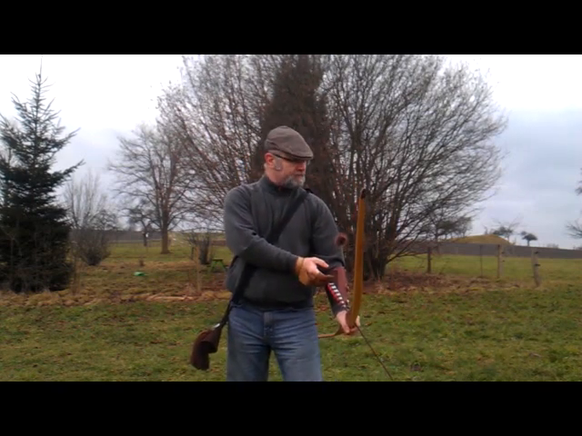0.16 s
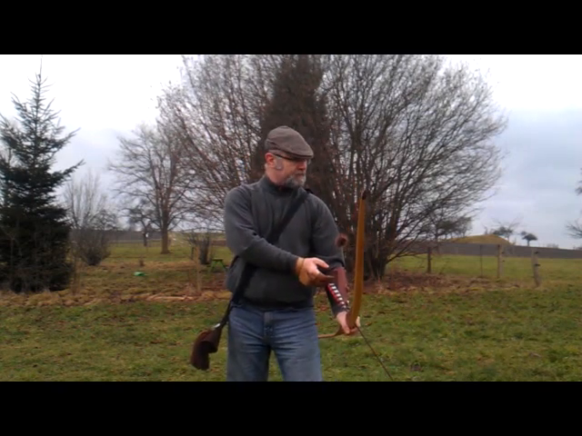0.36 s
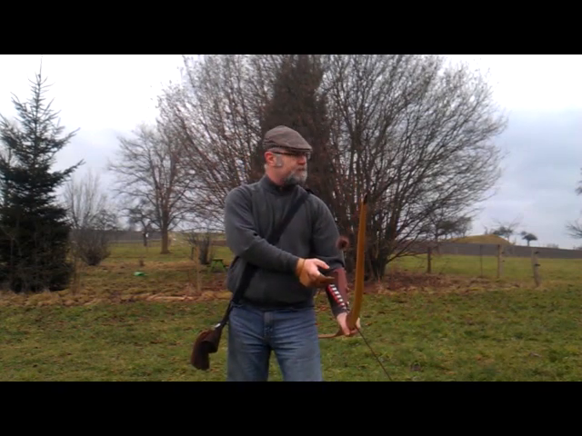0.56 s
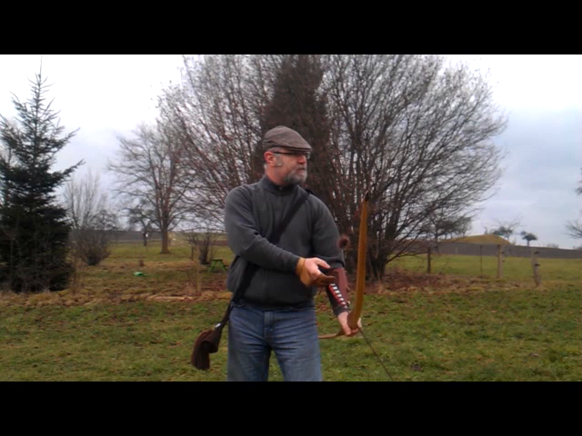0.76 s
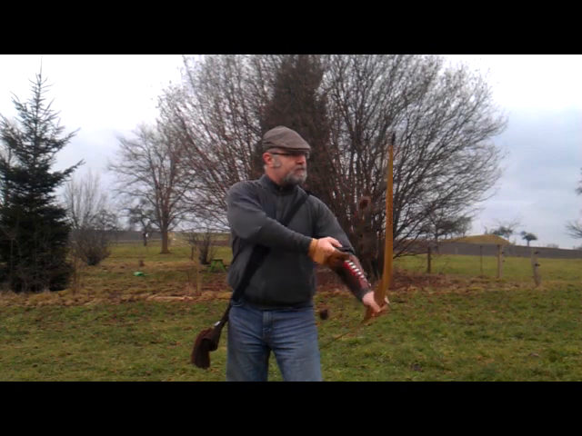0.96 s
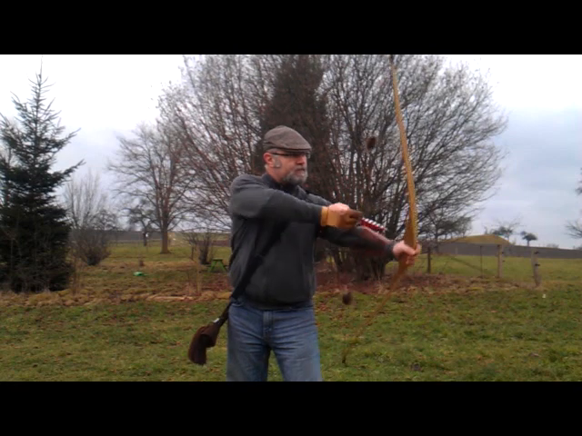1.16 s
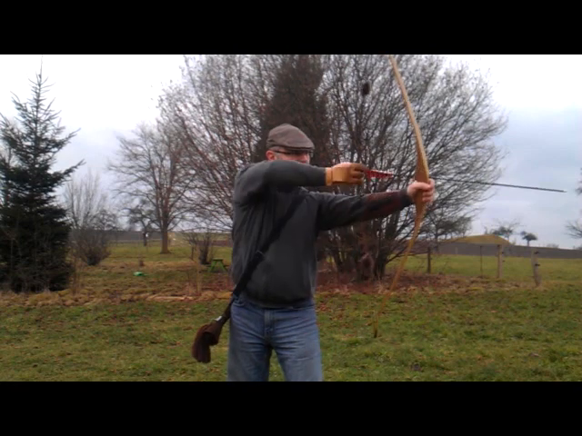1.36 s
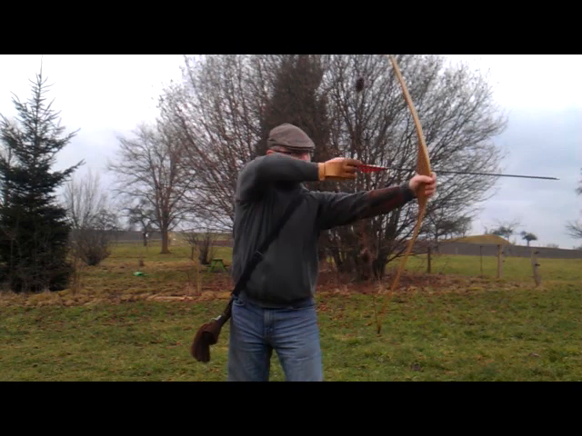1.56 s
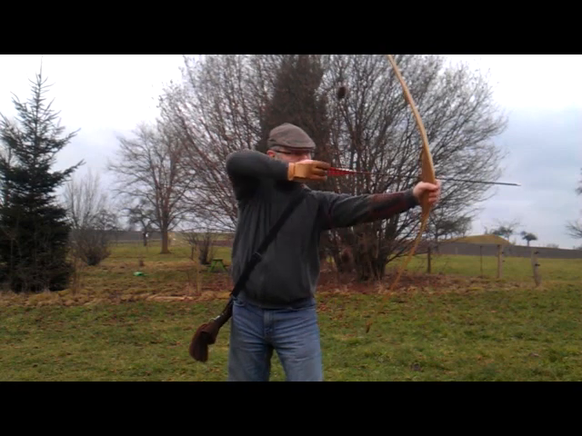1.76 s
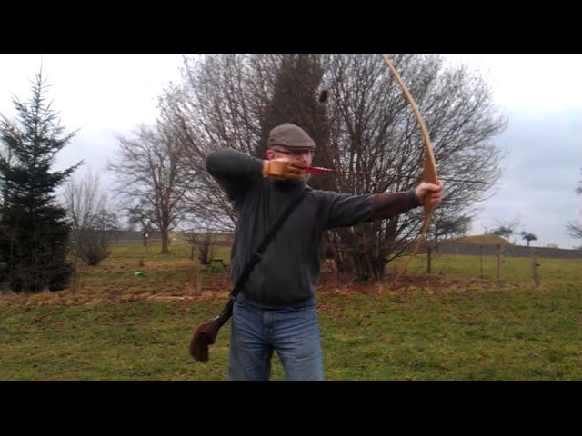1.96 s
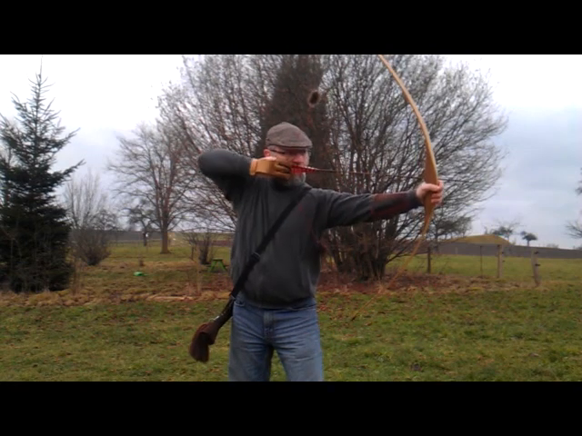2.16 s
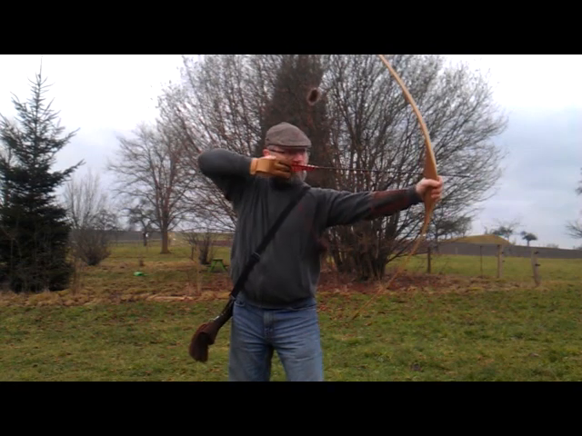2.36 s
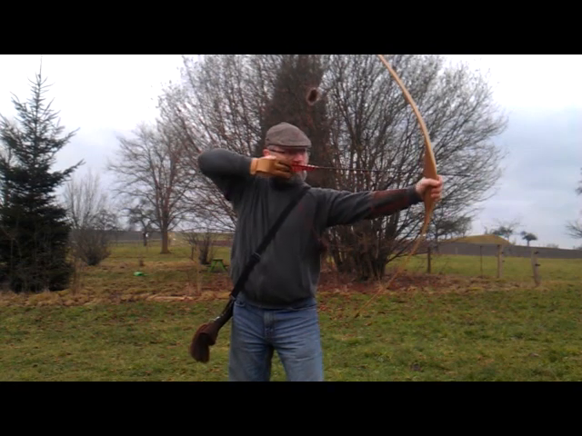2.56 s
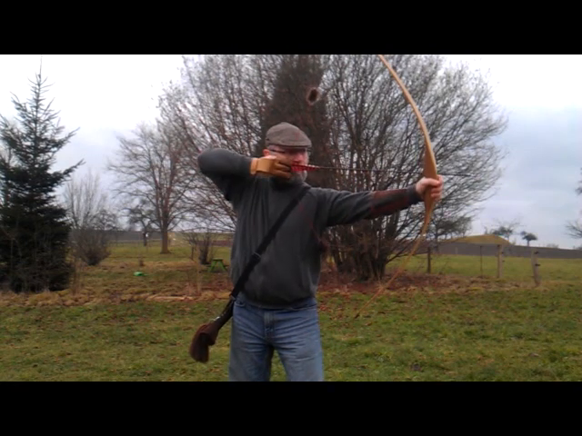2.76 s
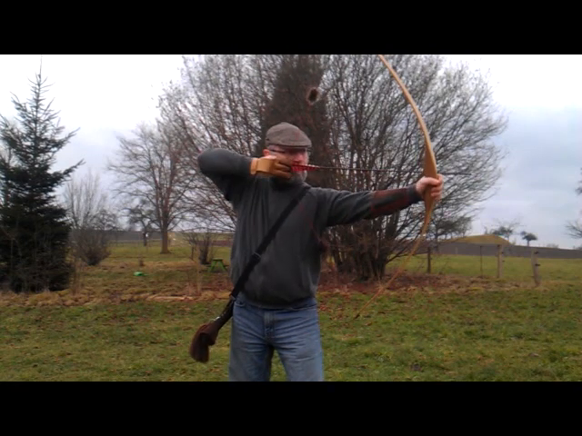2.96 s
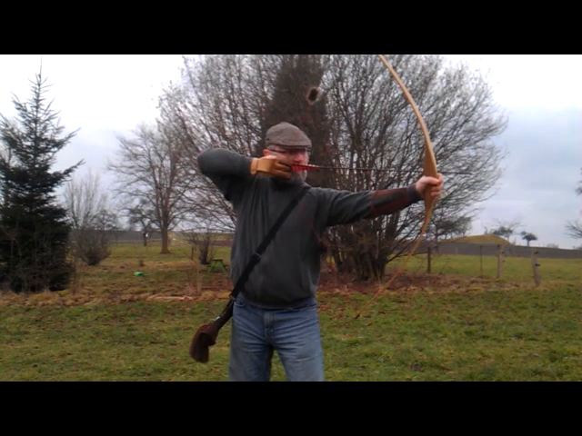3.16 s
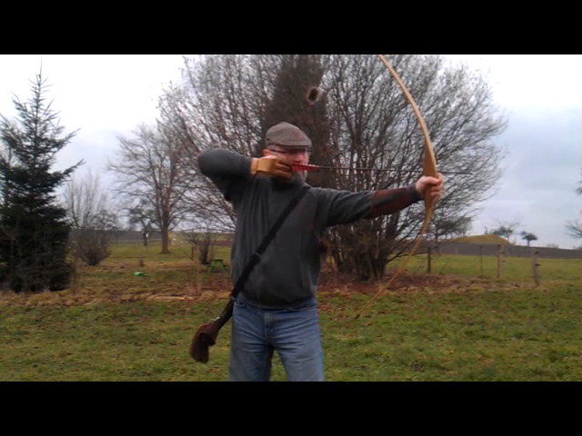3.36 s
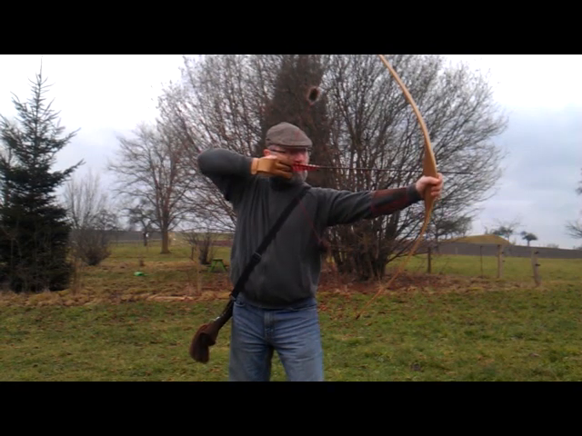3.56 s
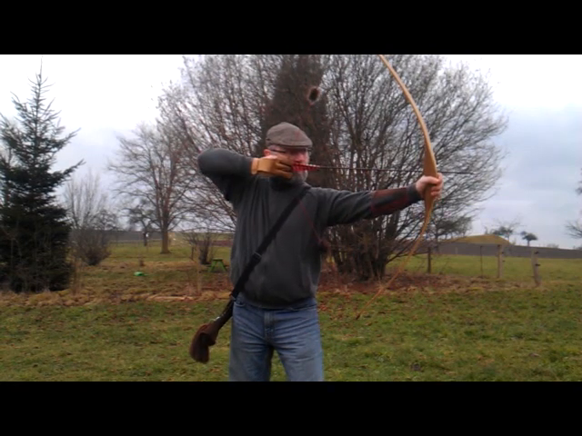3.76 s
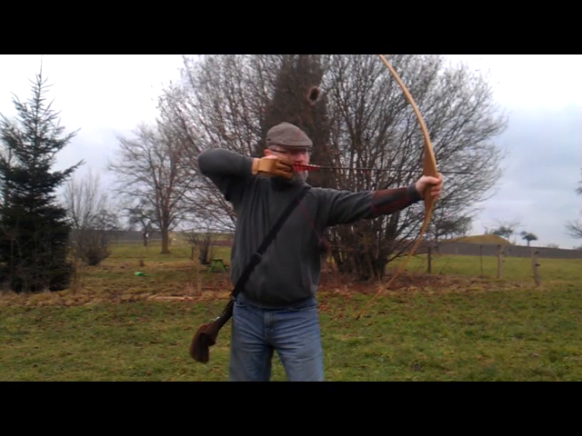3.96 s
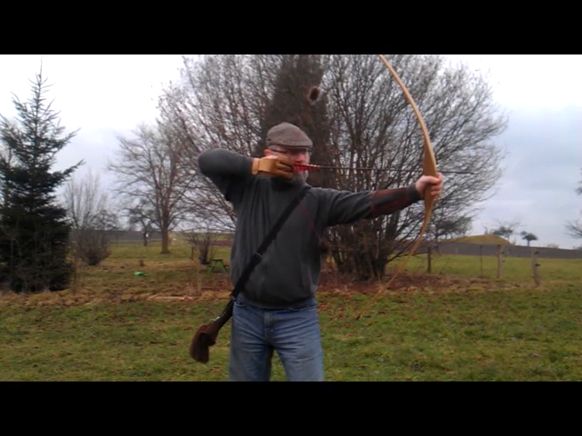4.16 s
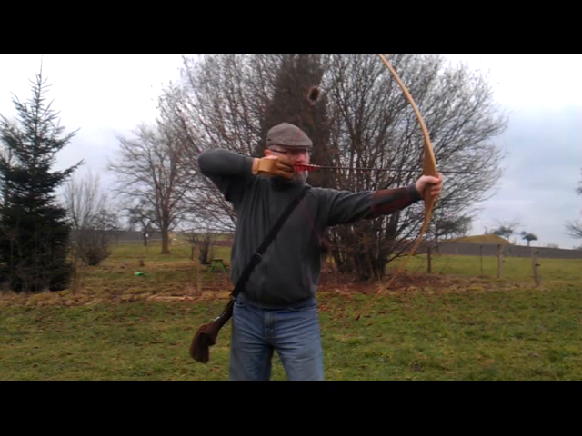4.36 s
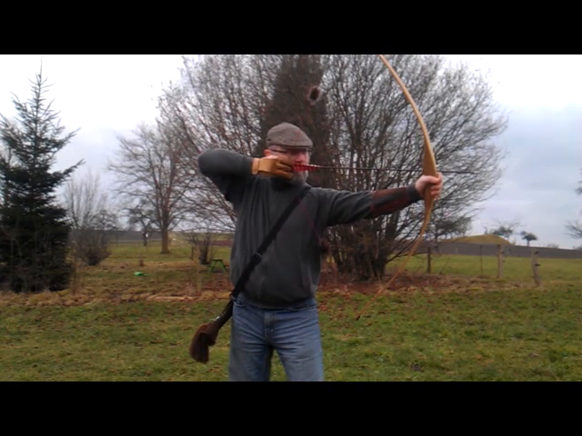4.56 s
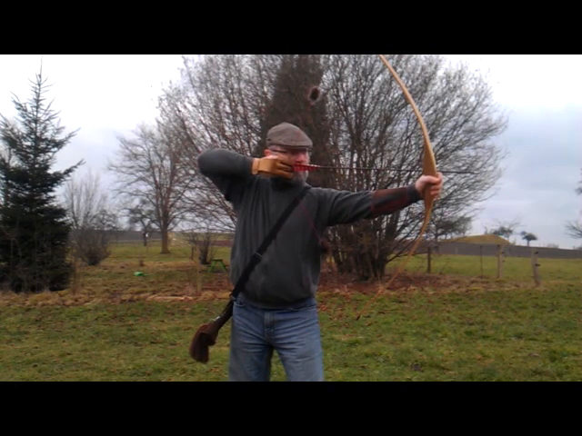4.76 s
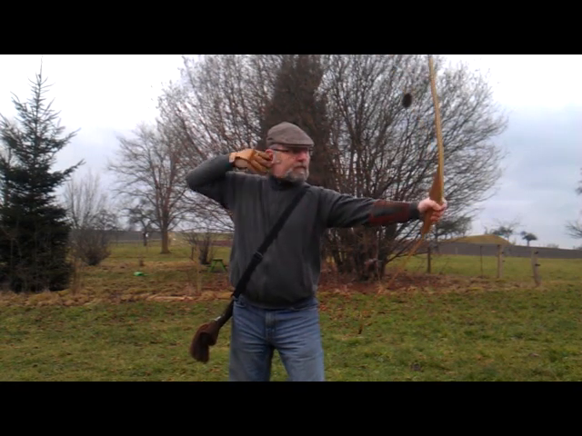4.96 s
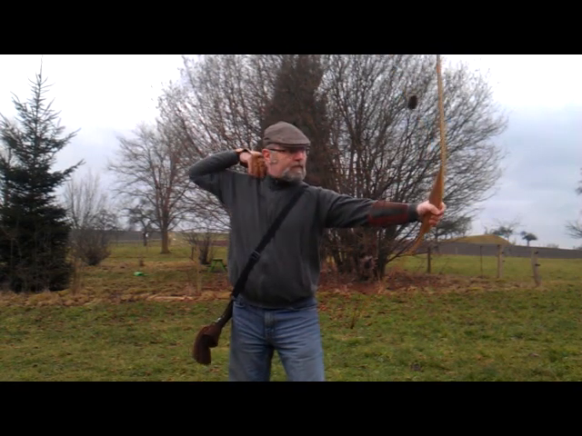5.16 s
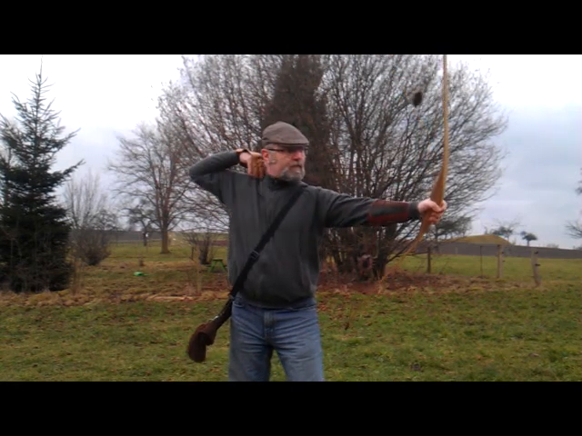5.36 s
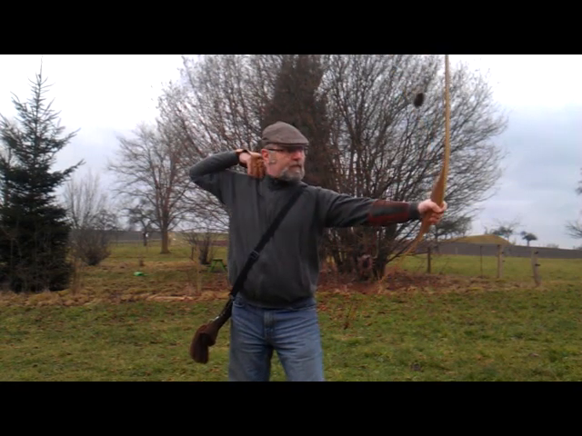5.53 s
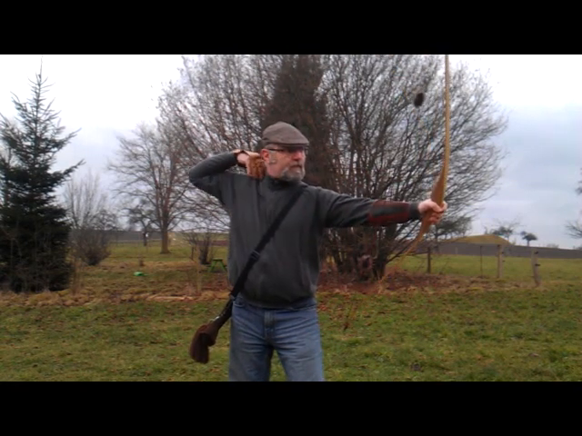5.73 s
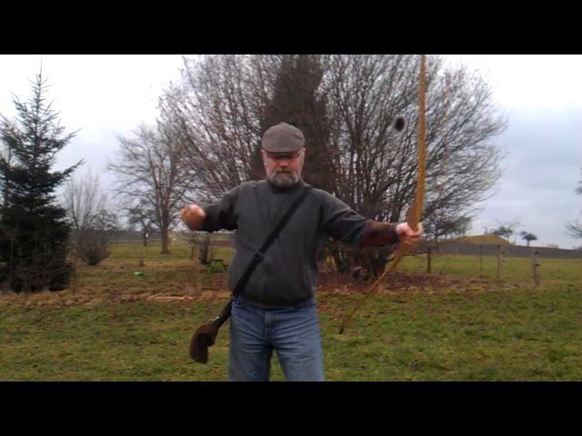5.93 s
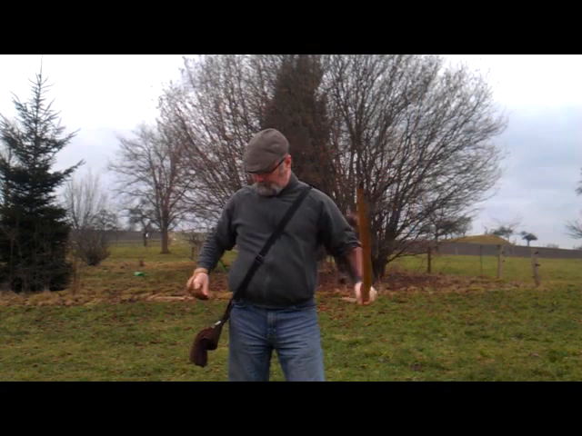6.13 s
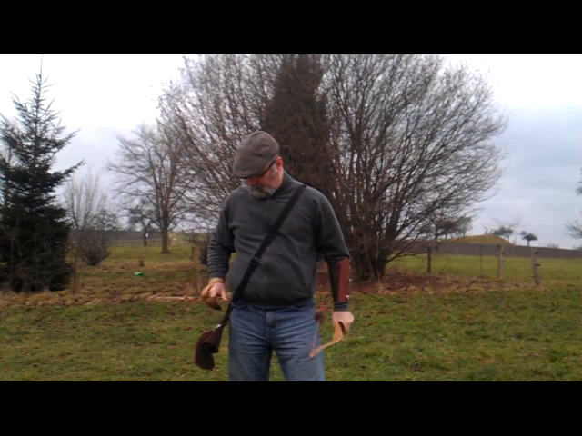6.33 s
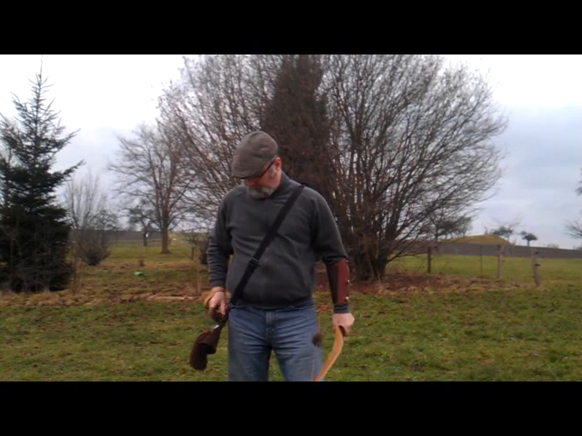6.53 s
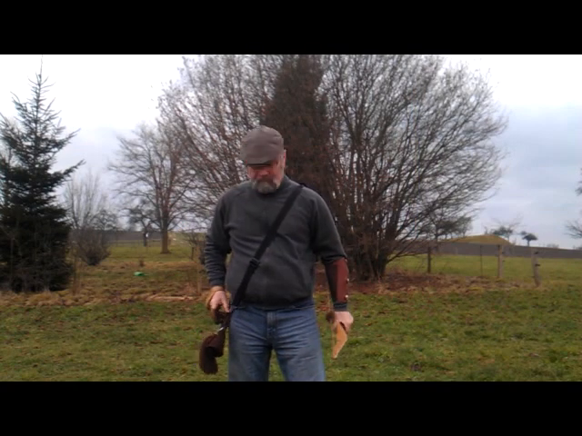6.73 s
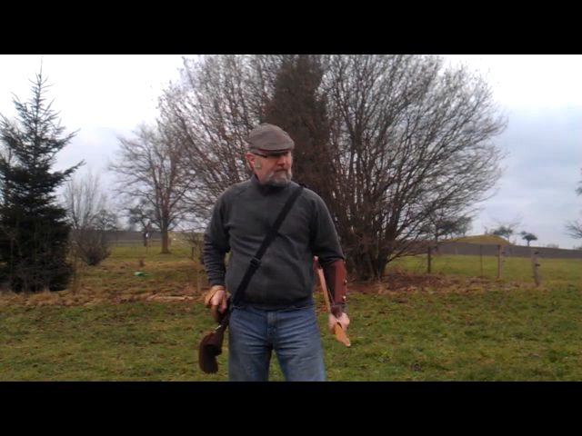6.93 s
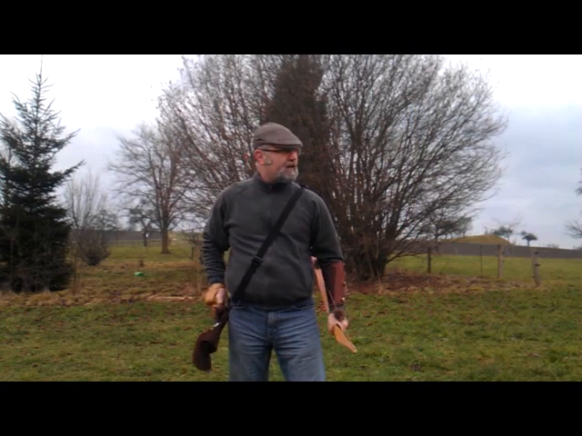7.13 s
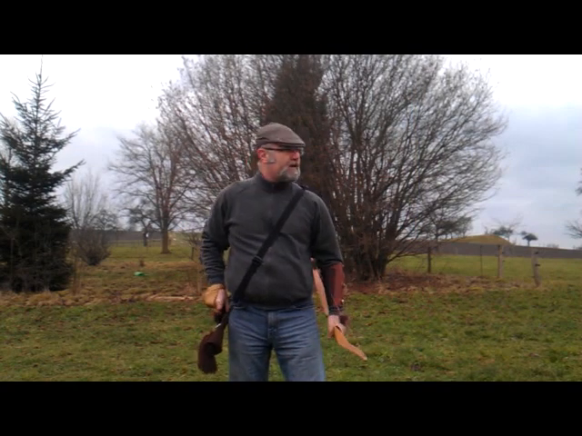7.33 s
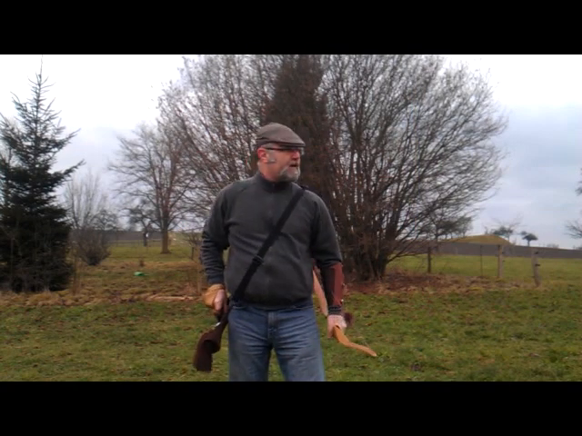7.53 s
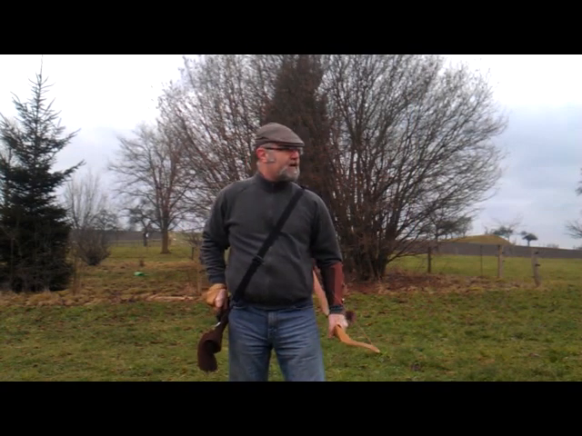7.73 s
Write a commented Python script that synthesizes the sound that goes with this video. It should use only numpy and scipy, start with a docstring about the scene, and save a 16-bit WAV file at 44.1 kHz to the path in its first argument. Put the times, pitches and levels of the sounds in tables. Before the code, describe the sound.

Quiet open field, small birds chirping and twittering over soft air and light low wind on the microphone. A faint grainy hiss marks the bow being drawn. After a long wait the string slaps loud and sharp with a quick swish and short woody ring; about a third of a second later the arrow cracks into a target with a dull hollow thud. Trees echo faintly, then birds, small rustles and gear ticks.

```python
"""In a quiet field, a longbow is drawn and shot, with small birds in the hedge and light wind on the microphone.
On the draw the shaft's grain combs a hiss; on release a gliding tone zips and noise bursts swish and scrape.
Bouncing clicks make the string's slap, and fading tones make the ring of the bow.
The arrow cracks into a target with a hollow thud; sparse random echoes from the trees answer both sounds.
Birds are gliding tones; air, wind, cloth and far tyres are shaped noise."""
import sys
import numpy as np
from scipy import signal
from scipy.fft import rfft, irfft
from scipy.io import wavfile
from scipy.ndimage import uniform_filter1d, map_coordinates

SR = 44100
rng = np.random.default_rng(int(sys.argv[2]) if len(sys.argv) > 2 else 0)


def generate_wav(sig):
    """Save sig (samples, or channels by samples) to the path in sys.argv[1] as 16-bit PCM at SR."""
    pcm = np.round(np.clip(np.atleast_2d(sig).T, -1, 1) * 32767).astype(np.int16)
    wavfile.write(sys.argv[1], SR, pcm)


N = 348257
TIME = np.arange(N) / SR
EDGE_HZ = 12560  # top of the sound band

# In every noise colour below, only the shape counts: overall loudness is set elsewhere.

# release: the shaft zipping over the bow [t/s, f/Hz, level/dB]
ZIP = [(4.841, 1890, -49), (4.845, 2440, -38), (4.848, 3040, -19), (4.8503, 3180, -28), (4.8515, 3200, -36)]
# fletching scraping past, nock snapping free [t/s, level/dB, fade setting/s], and their colour [f/Hz, level/dB per Hz]
SCRAPES = [(4.8502, -18.5, .0012), (4.8521, -18, 0.0024), (4.854, -19.5, .0014), (4.8624, -14.5, 0.00043)]
SCRAPE_COLOUR = [(1500, -11), (3300, 0.5), (4600, -12.5), (6800, 2), (8700, -0.5), (10000, -7), (11200, -2),
                 (12500, -6)]
# string leaving the glove, rushing forward, stirring the air [t/s, level/dB, rise/s, hold/s, fall/s]
SWISHES = [(4.8372, -35, 0.0037, .002, .0036), (4.8497, -28, 0.0024, 0.019, .005),
           (4.85, -42, 0.013, 0.029, 0.015)]
# colour of the swish [f/Hz, level/dB per Hz]
SWISH_COLOUR = [(100, -7), (250, 2.5), (430, 5), (1300, 1.5), (2300, -2), (4500, -5.5), (8000, 3),
                (9800, -7), (12500, -16)]
# string slapping the arm guard [t/s, level/dB, time between bounces/s, loss per bounce/dB]
SLAPS = [(4.8506, -1, .0034, 7), (4.8628, -8, .0033, 24), (4.866, -3.5, .0033, 5), (4.9093, -18, .0038, 7),
         (4.9375, -31, .0035, 4)]
# colour of the slap [f/Hz, level/dB per Hz]
SLAP_COLOUR = [(60, -18), (260, -7), (600, -2), (1150, 4), (1600, -0.5), (2400, -11), (5000, -30),
               (12000, -47)]
# ring of bow and string [f/Hz, level/dB, time to fade by 60 dB/s]
BOW_MODES = [(539, -30, 0.14), (610, -32, .07), (693, -40.5, 0.22), (797, -31.5, .08), (930, -31, 0.049),
             (1163, -33, 0.075)]

# the hit: start of the point's crack [s]
HIT_S = 5.1361
# colour of the crack [f/Hz, level/dB per Hz]
CRACK_COLOUR = [(200, -9.5), (700, -6), (1100, -6.5), (1500, -0.5), (1850, 3), (2400, -10.5), (3000, -9.5),
                (3600, -2.5), (4800, -7.5), (6400, -15), (7100, -9), (7900, -4), (8500, -25), (9200, -7),
                (10200, -23), (12500, -31)]
# hollow thud of the target [f/Hz, level/dB, time to fade by 60 dB/s]
TARGET_MODES = [(166, -17, 0.038), (205, -18.5, 0.032), (310, -21, 0.038), (426, -24.5, 0.034),
                (602, -31, 0.043)]
# dying jolts of the shaft buzzing in the target [t/s, level/dB, decay/s]
JOLTS = [(5.138, -20.5, 0.003), (5.148, -34, .0045), (5.166, -48, .005)]
JOLT_RISE_S = .0006
# colour of the buzz [f/Hz, level/dB per Hz]
BUZZ_COLOUR = [(300, -21), (1600, -2), (2800, -13), (4800, -5), (6200, -8), (7400, 3), (8400, -3.5),
               (10000, -17), (12500, -19)]
# colour of what the trees send back [f/Hz, level/dB]
TREES_COLOUR = [(150, -8), (600, -4), (1800, -4), (4000, 0), (8000, -1), (12000, -3)]

# the draw: one rubbing stroke; RUB_DB is its level at RUB_S, before the slow growth
RUB_S, RUB_DB, RUB_RISE_S, RUB_HOLD_S, RUB_FALL_S = 1.59, -56.3, .05, 0.511, 0.034
RUB_GROWTH_DB_PER_S = 3.5
# colour of the rub [f/Hz, level/dB per Hz]
RUB_COLOUR = [(1000, -24), (2200, -17), (3300, -8), (5500, -7.5), (7000, -2.5), (7900, -1), (8700, -3.5),
              (9300, -11), (12500, -19.5)]
# middle rate of the grain passing the bow, before it wavers [t/s, f/Hz]
GRAIN_HZ = [(1.55, 980), (1.65, 1090), (1.8, 1130), (1.94, 1080), (2.02, 1210), (2.12, 1430)]

# sleeves and leather shifting [start t/s, length/s, level/dB], and their colour [f/Hz, level/dB per Hz]
RUSTLES = [(-.06, 0.27, -56), (0.893, 0.14, -63.5), (1.18, 0.12, -62.5), (3.85, 0.32, -67.5),
           (4.2, .16, -63.5), (5.95, .22, -67.5), (6.98, 0.11, -66), (7.3, 0.2, -60.5)]
CLOTH_COLOUR = [(900, -14), (2200, -7.5), (4200, 0), (7700, -2), (9500, -7.5), (12500, -14)]
# small ticks of the gear [t/s, level/dB before a shared cut], and their colour [f/Hz, level/dB per Hz]
TICKS = [(5.283, -46.5), (7.063, -47.5), (7.235, -52.5), (7.416, -46), (7.4324, -37.5), (7.4443, -46),
         (7.5465, -49.5)]
TICK_COLOUR = [(1000, -16), (4500, -16), (7000, 1.5), (9000, -7.5), (12500, -20)]

# bird levels are before the direct and echo gains in birds()
# tune of the falling chirrup [t/s from its start, f/Hz, relative level/dB]
CHIRRUP = [(0, 3823, -9), (.011, 5300, 0), (.023, 5400, 0.5), (.039, 4450, -2.5), (.047, 3143, -4),
           (.058, 4310, -3), (.072, 3700, 1.5), (.112, 2800, -7)]
# its calls [t/s, level/dB, gain from start to end/dB, second voice as a factor on the pitch]
CHIRRUPS = [(1.292, -57, -1.5, 0.9), (2.254, -51, -11, 0.92), (2.862, -56, -1.5, .9), (3.728, -57.5, -1, 1),
            (4.311, -51, -6, 0.92), (5.322, -51, -4, 0.85), (6.256, -52, -5.5, .92), (7.058, -62, -2, 0.79),
            (7.458, -52.5, -3.5, 0.91)]
# arched chirps placed one by one, with one faint low distant peep
# [t/s, length/s, foot f/Hz, top f/Hz, level/dB]
CHIRPS = [(1.181, .088, 2800, 4370, -55), (1.172, .09, 4000, 5470, -67), (1.524, 0.027, 3500, 4070, -58),
          (1.827, 0.072, 3790, 5450, -51.5), (1.949, 0.041, 3720, 4750, -59),
          (2.48, 0.034, 3840, 4150, -56.5), (2.523, 0.021, 4200, 6000, -58), (2.868, .028, 3380, 4020, -56),
          (2.923, .035, 3100, 4700, -60), (3.68, .079, 4400, 5590, -58), (3.855, 0.062, 3690, 5500, -60.5),
          (4.325, 0.044, 2970, 4100, -56), (4.436, 0.044, 3800, 5370, -58),
          (4.485, 0.045, 3550, 3750, -55.5), (4.526, 0.032, 3480, 4180, -57.5),
          (5.244, .047, 3750, 4170, -56.5), (5.351, 0.047, 2870, 3790, -57), (5.664, .043, 4000, 5580, -64),
          (6.8, 0.04, 3520, 4220, -57), (6.816, .068, 4100, 5680, -54.5), (6.935, 0.038, 3500, 4560, -57.5),
          (6.963, .018, 1500, 1590, -62), (7.055, 0.03, 3490, 4110, -51), (7.088, 0.045, 2790, 3290, -56.5)]
# a chirp peaks early and is softer at its ends
CHIRP_SKEW, CHIRP_FADE_DB = .88, 2.5
# one thin high whistle [t/s, f/Hz, level/dB]
WHISTLE = [(5.533, 7950, -55), (5.54, 8100, -53.5), (5.57, 8190, -53), (5.605, 8220, -53),
           (5.635, 8160, -59), (5.66, 8100, -52.5), (5.682, 7700, -61)]
# bouts of twittering from the farther flock [start t/s, length/s, level/dB]
BOUTS = [(0.548, .1, -65.5), (1.057, .22, -65), (1.689, .12, -59.5), (2.36, .22, -64), (2.843, .1, -61),
         (3.332, .19, -65), (3.9, .15, -63), (4.158, .15, -65), (4.51, .06, -65), (5.17, .06, -61),
         (5.723, .07, -64.5), (6.022, .11, -63), (6.449, .22, -70.5), (6.975, .23, -61.5), (7.35, .06, -63)]
# high and low notes of a bout, before random spread [foot f/Hz, top f/Hz]
NOTES = [(4210, 5400), (3593, 4300)]
# middle spacing and length of the notes [s]; largest pitch change as a share
NOTE_GAP_S, NOTE_S, NOTE_SPREAD = .053, .05, 0.0503

# light breeze on the microphone, before lumps [t/s, level/dB]
BREEZE_DB = [(0, -74), (3.1, -71), (4.2, -60.5), (6.2, -67.5), (7.9, -63.5)]
# gusts on top of the breeze [start t/s, length/s, level/dB before lumps]
GUSTS = [(1.94, .16, -53.5), (2.31, .17, -60), (2.69, .11, -61), (3.36, .35, -61), (3.73, 0.14, -49),
         (3.88, 0.15, -53.5), (4.14, 0.23, -54.5), (4.53, .1, -52), (4.68, .12, -50.5), (5.33, .13, -54.5),
         (5.68, 0.35, -54.5), (7.02, .12, -53), (7.28, 0.23, -54.5), (7.75, 0.18, -53.5)]
# colour of the wind [f/Hz, level/dB per Hz]
WIND_COLOUR = [(10, -11), (25, -3.5), (55, -1), (80, -2.5), (140, -11.5), (200, -25), (300, -30),
               (600, -62)]
# typical size of the wind's lumps [dB] and their fastest rate [Hz]
LUMPS_DB, LUMPS_PER_S = 2.5, 16
# far tyres singing as a car passes [start t/s, length/s, level/dB], and their colour [f/Hz, level/dB per Hz]
TYRES_PASS = [(2.7, 1.35, -67.5)]
TYRES_COLOUR = [(700, -58), (920, -18), (965, -1), (1010, -19), (1170, -8), (1300, -55)]
# still air: its colour [f/Hz, level/dB per Hz] and its level over time [t/s, level/dB]
AIR_COLOUR = [(18, -33.5), (30, -4.5), (59, -1.5), (106, -14), (189, -10.5), (215, -15), (270, -16.5),
              (507, -15), (652, -14), (952, -14.5), (1110, -17.5), (3720, -25.5), (4010, -24), (7740, -26),
              (12500, -29), (16200, -70), (22000, -120)]
AIR_DB = [(0, -59.5), (5.8, -59), (7.9, -58)]


def release():
    """The string rushes forward, the arrow zips off, the string slaps home and the bow rings."""
    zipping, scrapes, wood = np.zeros((3, N))
    add(zipping, ZIP[0][0], glide(ZIP, waver=.01, overtone=.04))
    for s, db, decay in SCRAPES:
        add(scrapes, s, amp(db) * burst(decay))
    add(wood, 4.862, ring(BOW_MODES, rise_s=0.0022))
    loudest_swish = np.max([envelope(*row) for row in SWISHES], axis=0)
    swish = hiss(SWISH_COLOUR) * loudest_swish
    slap = -colour(chatter(), SLAP_COLOUR)
    shot = swish + wood + colour(scrapes, SCRAPE_COLOUR) + slap
    echo = scatter(shot + .3 * zipping, delay_s=.015, t60=0.94, rise_s=.01)
    return shot + zipping + amp(-26) * echo


def chatter(count=5):
    """Each slap of the string is a row of clicks: it bounces a few times, ever weaker."""
    blows = np.zeros(N)
    for s, db, gap_s, loss_db in SLAPS:
        for k in range(count):
            add(blows, s + k * gap_s, amp([db - k * loss_db]))
    return blows


def hit():
    """The point tears in, the target thuds, the shaft buzzes, and the tree line answers unevenly."""
    tear, thud = np.zeros((2, N))
    add(tear, HIT_S, amp(-12) * burst(decay_s=.0003, hold_s=0.001493))
    add(thud, 5.137, -ring(TARGET_MODES, rise_s=0.0025))
    jolts = sum(envelope(s, db, JOLT_RISE_S, 0, decay_s) for s, db, decay_s in JOLTS)
    buzz = hiss(BUZZ_COLOUR) * jolts
    impact = thud + colour(tear, CRACK_COLOUR) + buzz
    echo = scatter(impact, delay_s=0.057, t60=0.87, rise_s=0.011, taps_per_s=6000)
    return impact + amp(-26.5) * echo * amp(2.2 * drift(70))


def draw():
    """The shaft rubs over the bow; its grain combs the hiss with wavering lines that follow its rate."""
    friction = rng.standard_normal(N)
    grain_hz = curve(GRAIN_HZ) * (1 + 0.043 * drift(24))
    # copies delayed by one and two grain periods make the comb
    once, twice = (map_coordinates(friction, [np.arange(N) - k * SR / grain_hz], order=3) for k in (1, 2))
    combed = friction + .55 * once + .2 * twice
    growth = amp(RUB_GROWTH_DB_PER_S * (TIME - RUB_S))
    stroke = envelope(RUB_S, RUB_DB, RUB_RISE_S, RUB_HOLD_S, RUB_FALL_S) * growth
    return unit(colour(combed, RUB_COLOUR)) * stroke * amp(1.6 * drift(90))


def gear():
    """Swells of unsteady noise make cloth rustles; brief bursts make leather ticks."""
    ticks = np.zeros(N)
    for s, db in TICKS:
        add(ticks, s, amp(db - 3.5) * burst(decay_s=0.0033, hold_s=.001))
    rustles = arches(RUSTLES) * hiss(CLOTH_COLOUR) * amp(1.5 * drift(120))
    return rustles + colour(ticks, TICK_COLOUR)


def birds():
    """Two-voiced chirrups, arched chirps, a whistle and a farther flock, all blurred by the branches."""
    song, thin = np.zeros((2, N))
    for s, db, swell_db, second in CHIRRUPS:
        swell = np.linspace(0, swell_db, len(CHIRRUP))
        tune = np.array(CHIRRUP) + np.outer(swell, [0, 0, 1])
        add(song, s, amp(db - 0.5) * glide(tune, waver=0.0303))
        # the other side of the syrinx, the bird's voice organ
        add(song, s, amp(db - 4.0) * glide(tune * [1, second, 1], waver=0.0388))
    for s, *note in CHIRPS:
        add(song, s, chirp(*note))
    song *= amp(1.8 * drift(150))
    add(thin, WHISTLE[0][0], glide(WHISTLE, waver=.002))
    hedge = amp(-1.5) * song + amp(-14.0) * scatter(song, delay_s=0.0035, t60=0.44, rise_s=0.0019)
    far = flock()
    beyond = amp(-2.2) * far + amp(-11) * scatter(far, delay_s=0.0033, t60=.45, rise_s=0.0028)
    whistle = thin + amp(-13.5) * scatter(thin, delay_s=.02, t60=.7, rise_s=.01)
    return hedge + beyond + whistle


def chirp(length, foot_hz, top_hz, db, waver=.013):
    """One note whose pitch and loudness rise and fall in an arch."""
    u = np.linspace(0, 1, 17)  # share of the note that has passed
    sag = (2 * u ** CHIRP_SKEW - 1) ** 2  # 0 at the peak, 1 at the ends
    hz = top_hz - (top_hz - foot_hz) * sag
    rows = np.transpose([u * length, hz, db - CHIRP_FADE_DB * sag])
    return glide(rows, waver=waver, overtone=0.11)


def flock():
    """Farther birds twitter in bouts, high and low notes in turn, loosely timed."""
    out = np.zeros(N)
    chances = rng.uniform(-1, 1, size=(len(BOUTS), 20, 4))
    for (s, length, db), chance in zip(BOUTS, chances):
        note_count = round(length / NOTE_GAP_S)
        for k, (late, long, sharp, loud) in enumerate(chance[:note_count]):
            foot_hz, top_hz = np.array(NOTES[k % 2]) * (1 + NOTE_SPREAD * sharp)
            note_s = NOTE_S * (1 + .25 * long)
            note = chirp(note_s, foot_hz, top_hz, db + 2 * loud, waver=.016)
            add(out, s + NOTE_GAP_S * (k + .2 * late), note)
    return out * amp(2.7 * drift(110))


def field():
    """Shaped noise makes steady air, lumpy gusts and the faint sing of far tyres."""
    air = hiss(AIR_COLOUR) * amp(curve(AIR_DB))
    blowing = np.hypot(amp(curve(BREEZE_DB)), arches(GUSTS))
    wind = hiss(WIND_COLOUR) * blowing * amp(LUMPS_DB * drift(LUMPS_PER_S))
    return air + wind + hiss(TYRES_COLOUR) * arches(TYRES_PASS)


def scatter(x, delay_s, t60, rise_s, taps_per_s=3500):
    """Echoes from trunks and twigs: sparse random taps that swell after a delay and die away."""
    t = np.maximum(np.arange(SR) / SR - delay_s, 0)
    taps = rng.standard_normal(SR) * (rng.random(SR) < taps_per_s / SR)
    taps *= (1 - np.exp(-t / rise_s)) * amp(-60 * t / t60)
    echoes = colour(taps / np.linalg.norm(taps), TREES_COLOUR)
    return signal.oaconvolve(x, echoes)[:N]


def burst(decay_s, hold_s=0, size=1024, count=12):
    """A brief crush of fibres: random in detail, yet holding all frequencies nearly evenly."""
    shape = np.exp(-np.maximum(np.arange(size) / SR - hold_s, 0) / decay_s)
    x = rng.standard_normal(size) * shape
    for _ in range(count):
        even = irfft(np.exp(1j * np.angle(rfft(x))))  # same strength at every frequency
        x = even * np.sqrt(shape)  # fade it again
    return x * np.linalg.norm(shape) / np.linalg.norm(x)


def ring(modes, rise_s):
    """A struck body sounds as a sum of pure tones, each dying at its own pace."""
    t = np.arange(SR // 2) / SR
    tones = sum(amp(db - 60 * t / t60) * np.sin(2 * np.pi * hz * t) for hz, db, t60 in modes)
    return (1 - np.exp(-t / rise_s)) * tones


def glide(rows, waver=0., overtone=0.):
    """A tone along (s, Hz, dB) rows, with an unsteady pitch and a share of the octave above."""
    s, hz, db = np.transpose(rows)
    t = np.arange(s[0], s[-1], 1 / SR)
    wobble = unit(uniform_filter1d(rng.standard_normal(SR), size=90))
    unsteady = 1 + waver * wobble[:len(t)]
    phase = 2 * np.pi * np.cumsum(np.interp(t, s, hz) * unsteady) / SR
    tone = np.sin(phase) + overtone * np.sin(2 * phase)
    soft_ends = signal.windows.tukey(len(t), .06)
    return np.sqrt(2) * amp(np.interp(t, s, db)) * tone * soft_ends


def hiss(spectrum):
    """Coloured noise with an average (rms) strength of 1."""
    return unit(colour(rng.standard_normal(N), spectrum))


def colour(x, spectrum, size=8192):
    """Filters a sound to the shape of a (Hz, dB) table, with unit energy and no sound ahead of its cause."""
    hz, db = np.transpose(spectrum)
    f = abs(np.fft.fftfreq(size, 1 / SR))
    log_gain = np.log(amp(np.interp(np.log(f + 1), np.log(hz + 1), db)))
    log_gain -= np.clip((f - EDGE_HZ) / 1000, 0, 4)  # extra fall above the band
    # minimum phase: the filter answers as early as it can
    taps = np.fft.ifft(np.exp(np.conj(signal.hilbert(log_gain)))).real[:size // 2]
    return signal.oaconvolve(x, taps / np.linalg.norm(taps))[:len(x)]


def drift(per_s):
    """Smooth random wander of rms 1, holding only changes slower than per_s in Hz."""
    spectrum = rfft(rng.standard_normal(N))
    return unit(irfft(spectrum * (np.fft.rfftfreq(N, 1 / SR) < per_s), N))


def arches(rows):
    """Gain of smooth swells given as (start s, length s, dB)."""
    return sum(amp(db) * np.sin(np.pi * np.clip((TIME - s) / length, 0, 1)) for s, length, db in rows)


def envelope(s, db, rise_s, hold_s, fall_s):
    """Gain that rises until time s, holds, and dies away."""
    t = TIME - s
    rise = np.minimum(t, 0) / rise_s
    fall = np.maximum(t - hold_s, 0) / fall_s
    return amp(db) * np.exp(np.maximum(rise - fall, -20))


def curve(rows, t=TIME):
    """Joins (s, value) rows by straight lines."""
    return np.interp(t, *np.transpose(rows))


def add(mix, s, sound):
    """Adds a sound to the mix at time s."""
    part = mix[round(s * SR):][:len(sound)]
    part += sound[:len(part)]


def amp(db):
    """Turns decibels into gain."""
    return 10 ** (np.asarray(db) / 20)


def unit(x):
    """Scales a sound to rms 1."""
    return x / np.sqrt(np.mean(x ** 2) + 1e-20)


def scene():
    """All sources at one microphone."""
    return (release() + hit() + draw() + gear() + birds() + field())[None]


def record(dry):
    """A steep low-pass filter removes the treble above the band edge."""
    low_pass = signal.firwin(501, EDGE_HZ, window=("kaiser", 9), fs=SR)
    return signal.oaconvolve(dry, low_pass[None], "same")


dry = scene()
out = record(dry)
generate_wav(out)
```